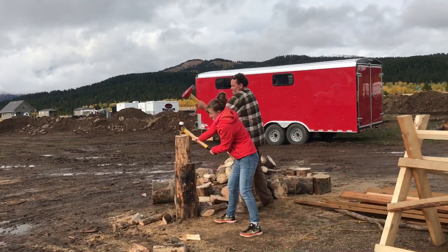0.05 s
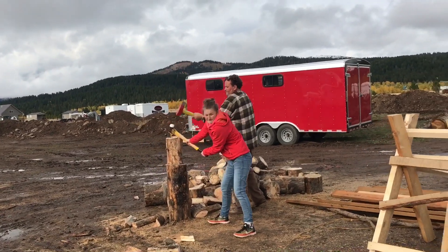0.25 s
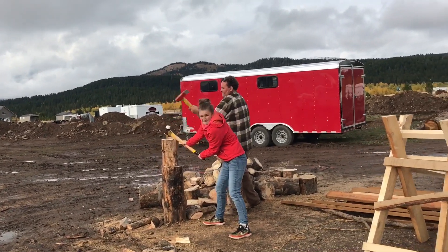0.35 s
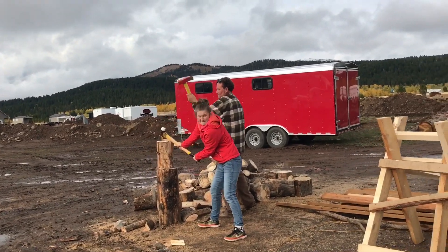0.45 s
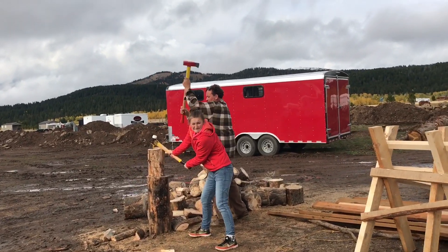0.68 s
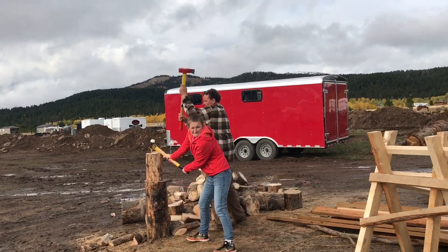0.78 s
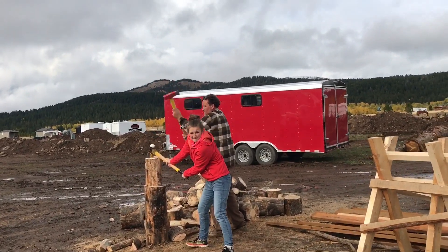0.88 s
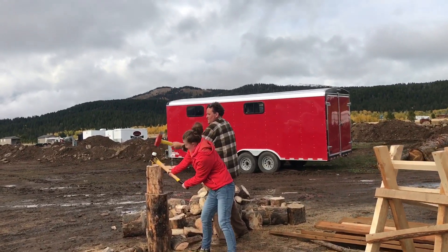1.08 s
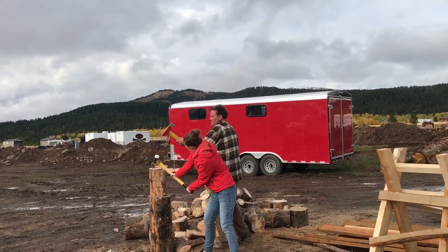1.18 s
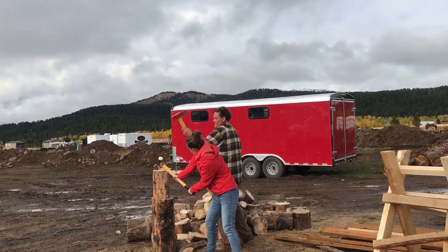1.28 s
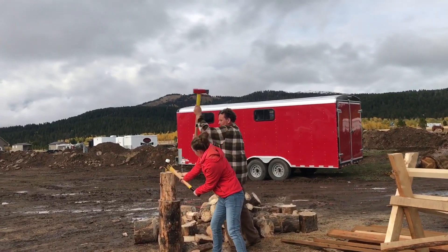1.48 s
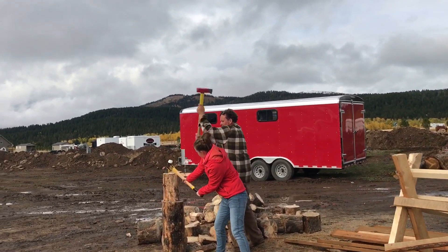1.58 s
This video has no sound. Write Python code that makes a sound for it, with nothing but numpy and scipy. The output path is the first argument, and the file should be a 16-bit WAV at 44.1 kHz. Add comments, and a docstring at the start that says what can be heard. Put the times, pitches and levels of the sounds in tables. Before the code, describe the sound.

Two sharp maul blows land on steel lodged in an upright log, each with a woody crack, thin ring and low thud. Faint ticks and scuffs surround them, a few metres off outdoors, with light wind on the microphone.

```python
"""Two maul blows on a log

A heavy maul twice hits a steel head stuck in an upright log, a few metres away in an open yard.
Each blow cracks, rings the wood and faintly the steel, and thumps the ground. The yard scatters
the sound and a trailer throws it back. Small ticks of wood and soft scuffs come around the blows,
and light wind buffets the microphone."""
import sys
import numpy as np
from scipy import signal
from scipy.fft import rfft, irfft
from scipy.io import wavfile

SR = 44100
rng = np.random.default_rng(int(sys.argv[2]) if len(sys.argv) > 2 else 0)


def dump_mix(stems):
    """Bounce the given channels to the path in sys.argv[1] as a 16-bit WAV at rate SR."""
    frames = np.atleast_2d(stems).T  # one column per channel
    limited = np.clip(frames, -1, 1)  # hard clip at full scale
    pcm = np.round(limited * 32767).astype(np.int16)
    wavfile.write(sys.argv[1], SR, pcm)


N = 72765

# A "fade" is the time to die away by 60 dB. A "tone" says how strong each pitch is in a noise.
# How the wind rises and falls: time_s, level_db
WIND_GUSTS = [(0, -46), (.07, -58.5), (.2, -42.5), (.4, -50), (.5, -56), (.72, -54), (.79, -57), (.83, -67),
              (.92, -68), (.96, -58), (1.07, -66), (1.24, -54.5), (1.3, -47.5), (1.36, -59.5),
              (1.55, -61.5), (1.65, -51)]
# Tone of wind on the microphone: pitch_hz, level_db
WIND_TONE = [(20, -23.5), (45, 1), (70, -0.5), (140, -7.5), (220, -15.5), (400, -31.5), (1000, -49.5),
             (4000, -77.5)]
# Tone of the distant air: pitch_hz, level_db
AIR_TONE = [(30, 2.5), (100, 0), (250, 1.5), (500, -4.5), (1000, -3), (2000, -8.5), (4000, -13.5),
            (8000, -19.5), (16000, -23.5)]
# Faint scuffs and rustles: middle_s, length_s, pitch_hz, level_db
SCUFF_EVENTS = [(0.121, 0.03, 1350, -66.5), (0.196, 0.055, 169, -57), (0.383, 0.017, 610, -57),
                (0.44, .09, 4400, -66.5), (0.634, 0.088, 1480, -63.5), (0.656, 0.023, 168, -53.5),
                (0.679, 0.031, 770, -65.5), (.712, 0.016, 168, -53.5), (0.893, 0.035, 2100, -73),
                (0.911, 0.026, 610, -67)]
# Small ticks of wood: start_s, level_db
TICK_EVENTS = [(.2080, -49), (0.3465, -45.5), (.4165, -55.5), (.527, -52), (0.682, -62), (1.0889, -54.5)]
# Tone of a tick: pitch_hz, level_db
TICK_TONE = [(150, 0), (400, 2.5), (1500, -2), (4500, -7), (8000, -21), (16000, -25.5)]
# The maul's blows: start_s, level_db, crack_tilt_db_per_octave, steel_db, thump_db
MAUL_BLOWS = [(0.2303, 0, -1, -3.5, 0.5), (1.1111, -1.5, -0.8, -8, 1)]
# Tone of steel first touching steel: pitch_hz, level_db
SNAP_TONE = [(500, -11.5), (2000, -2), (4500, -0.5), (6000, -10.5), (8500, 3), (12000, -7.5),
             (16000, -12.5)]
# Notes the log rings with: pitch_hz, fade_s, first_blow_db, second_blow_db
LOG_NOTES = [(316, 0.15, -23, -20), (366.4, .2, -26.5, -27), (566, 0.16, -30, -31.5),
             (664, 0.04, -13.5, -24), (876, 0.068, -16, -18), (995, 0.031, -32.5, -13),
             (1125, 0.063, -14.5, -21.5), (1344, 0.038, -23, -20), (1568, 0.052, -18, -15.5),
             (1796, .05, -20.5, -22), (2250, 0.07, -24, -25.5), (2710, 0.035, -24, -25.5),
             (2848, 0.063, -28.5, -26.5), (3190, 0.038, -20, -28.5)]
# Notes the steel rings with: pitch_hz, fade_s, level_db
STEEL_NOTES = [(3838, .06, -26), (4613, .07, -27.5), (5290, 0.11, -32.5), (6436, .09, -27.5),
               (7920, 0.29, -38), (11160, .11, -35)]
# Tone of wood fibres being crushed: pitch_hz, level_db
CRACK_TONE = [(100, -10), (200, 0), (450, -13.5), (800, 5.5), (1600, -0.5), (3500, -1.5), (6000, -9.5),
              (8500, -11.5), (12000, -15.5), (16000, -12)]
# Tone of sound scattered by the ground and woodpile: pitch_hz, level_db
SCATTER_TONE = [(60, -0.5), (130, 2.5), (220, 1.5), (450, 0), (850, 2), (2000, -5), (4000, -9),
                (7000, -17.5), (11000, -23), (16000, -27)]
# Tone of the wash of sound from the far yard: pitch_hz, level_db
WASH_TONE = [(100, 1), (400, 3.5), (1500, 0.5), (4500, -12), (8000, -22), (16000, -26.5)]
# Tone of the faint hiss after a blow: pitch_hz, level_db
HISS_TONE = [(500, -5.5), (3000, 3.5), (8000, -1), (15000, -4)]
# Echoes off the trailer: delay_s, first_blow_db, second_blow_db
TRAILER_ECHOES = [(.022, -15, -25), (.0665, -28, -26.5), (.0855, -21, -22.5)]

TIME_S = np.arange(N) / SR
PITCHES_HZ = np.fft.rfftfreq(N, 1 / SR)


def gain(db):
    """Turn decibels into a number to multiply by."""
    return 10 ** (np.asarray(db) / 20)


def tone_gain(hz, tone):
    """How strong a tone table is at the given pitches."""
    table_hz, table_db = np.array(tone, float).T
    return gain(np.interp(np.log(hz + 1), np.log(table_hz), table_db))


def noise(tone):
    """Noise with the given tone, at a level of one."""
    shaped = irfft(rfft(rng.standard_normal(N)) * tone_gain(PITCHES_HZ, tone), N)
    return shaped / shaped.std()


def since(start_s):
    """Seconds since a moment, zero before it."""
    return np.maximum(TIME_S - start_s, 0)


def envelope(start_s, rise_s, fade_s, hold_s=0):
    """A loudness shape that rises, holds and dies away."""
    t = since(start_s)
    return (1 - np.exp(-t / rise_s)) * np.exp(-np.log(1000) * np.maximum(t - hold_s, 0) / fade_s)


def wind():
    """Gusts rumble on the microphone over quiet distant air."""
    gusts = gain(np.interp(TIME_S, *np.array(WIND_GUSTS).T))
    return gusts * noise(WIND_TONE) + gain(-66.5) * noise(AIR_TONE)


def scuffs(slope_db_per_octave=-24.5):
    """Soft swells of noise, each around one pitch, as from boots and clothes."""
    out = 0
    for middle_s, length_s, hz, db in SCUFF_EVENTS:
        tone = [(hz * 2. ** octave, slope_db_per_octave * abs(octave)) for octave in range(-2, 3)]
        swell = np.exp(-2 * ((TIME_S - middle_s) / length_s) ** 2)
        out = out + gain(db) * noise(tone) * swell
    return out


def ticks():
    """The handle and wood chips make light, dry taps."""
    taps = sum(gain(db) * envelope(start_s, rise_s=.00033, fade_s=.03, hold_s=.0016)
               for start_s, db in TICK_EVENTS)
    return noise(TICK_TONE) * taps


def strike(blow, start_s, tilt_db, steel_db):
    """Steel snaps against steel, the wood cracks and knocks, and the steel rings thinly."""
    wood = sum(gain(blow_db[blow]) * ring(start_s + rng.random() / hz, hz, fade_s, rise_s=.0006)
               for hz, fade_s, *blow_db in LOG_NOTES)
    steel = sum(gain(db + steel_db) * ring(start_s, hz, fade_s, rise_s=.0004)
                for hz, fade_s, db in STEEL_NOTES)
    snap_shape = envelope(start_s, rise_s=.0001, fade_s=.0027, hold_s=.00033)
    snap = gain(-9.5) * noise(SNAP_TONE) * snap_shape
    return snap + crack(start_s, tilt_db) + wood + steel


def ring(start_s, hz, fade_s, rise_s):
    """One fading note of something that was hit."""
    return envelope(start_s, rise_s, fade_s) * np.sin(2 * np.pi * hz * since(start_s))


def crack(start_s, tilt_db):
    """Wood fibres crush in a short burst; the low pitches come later and last longer."""
    edges_hz = np.geomspace(120, 17000, 15)
    centres_hz = np.sqrt(edges_hz[1:] * edges_hz[:-1])
    shares = tone_gain(centres_hz, CRACK_TONE) * np.sqrt(np.diff(edges_hz))
    shares /= np.linalg.norm(shares)
    white_spectrum = rfft(rng.standard_normal(N))
    out = 0
    for low_hz, high_hz, khz, share in zip(edges_hz, edges_hz[1:], centres_hz / 1000, shares):
        shape = envelope(start_s, rise_s=.00094 / khz, fade_s=.032 / khz ** .4, hold_s=.003)
        in_band = (PITCHES_HZ >= low_hz) & (PITCHES_HZ < high_hz)
        band = irfft(white_spectrum * in_band, N) * shape
        band *= np.linalg.norm(shape) / np.linalg.norm(band)  # even out chance changes in level
        out = out + band * share * gain(tilt_db * np.log2(khz))
    return gain(-9.5) * out


def yard(start_s):
    """The ground and woodpile scatter a blow, the far yard answers, and a faint hiss hangs on."""
    scatter = gain(-25.5) * noise(SCATTER_TONE) * envelope(start_s, rise_s=.006, fade_s=.24)
    wash = gain(-50) * noise(WASH_TONE) * envelope(start_s, rise_s=.03, fade_s=1.2)
    hiss = gain(-67) * noise(HISS_TONE) * envelope(start_s, rise_s=.02, fade_s=.1, hold_s=.407)
    scatter *= flicker(changes_per_s=420, spread_db=2)  # separate bounces off logs and splinters
    wash *= flicker(changes_per_s=68, spread_db=2.5)
    return scatter + wash + hiss


def flicker(changes_per_s, spread_db):
    """A random wobble in loudness that keeps the average power the same."""
    wobble = gain(spread_db * np.interp(TIME_S * changes_per_s, np.arange(N), rng.standard_normal(N)))
    return wobble / np.sqrt(np.mean(wobble ** 2))


def thump(blow_s, first_hz=249, last_hz=61, sag_s=.007):
    """The log drives into the soil: a low thud whose pitch falls as the soil gives way."""
    start_s = blow_s + .004
    t = since(start_s)
    cycles = last_hz * t + (first_hz - last_hz) * sag_s * (1 - np.exp(-t / sag_s))
    return gain(-15.5) * envelope(start_s, rise_s=.013, fade_s=.16) * np.sin(2 * np.pi * cycles)


def trailer_echoes(blow, hit, band_hz=(1150, 3300)):
    """The trailer throws back late, thin copies of a hit."""
    thin = signal.sosfilt(signal.butter(1, band_hz, "bandpass", fs=SR, output="sos"), hit)
    return sum(gain(blow_db[blow]) * np.pad(thin, (int(delay_s * SR), 0))[:N]
               for delay_s, *blow_db in TRAILER_ECHOES)


def scene():
    """Two blows in the windy yard, in one channel."""
    out = wind() + ticks() + scuffs()
    for blow, (start_s, db, tilt_db, steel_db, thump_db) in enumerate(MAUL_BLOWS):
        hit = strike(blow, start_s, tilt_db, steel_db)
        out += gain(db) * (hit + yard(start_s) + trailer_echoes(blow, hit))
        out += gain(thump_db) * thump(start_s)
    return out[None]


def record(dry, drive=.83, top_hz=15800):
    """Round off the loudest peaks and cut the very highest pitches."""
    rounded = np.tanh(drive * dry) / drive
    return signal.sosfilt(signal.ellip(8, .2, 80, top_hz, fs=SR, output="sos"), rounded)


dry = scene()
out = record(dry)
dump_mix(out)
```